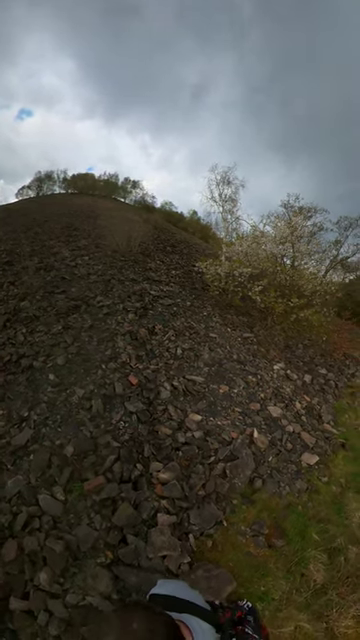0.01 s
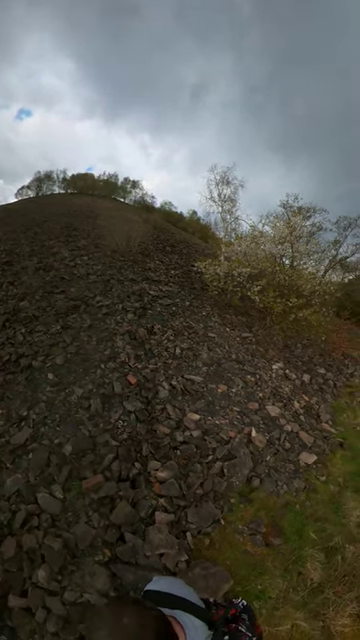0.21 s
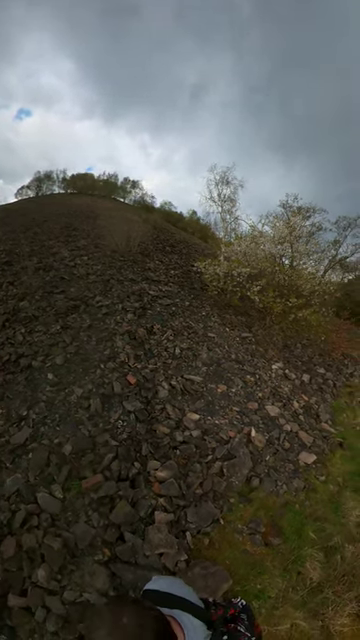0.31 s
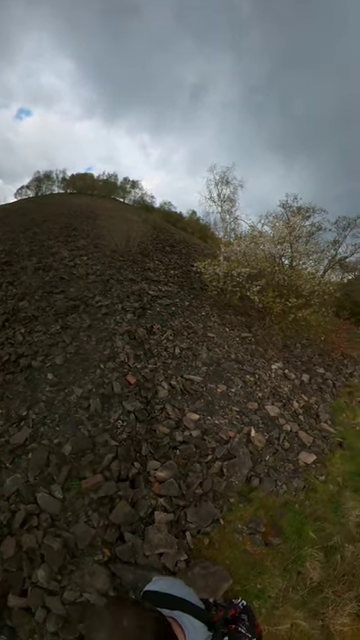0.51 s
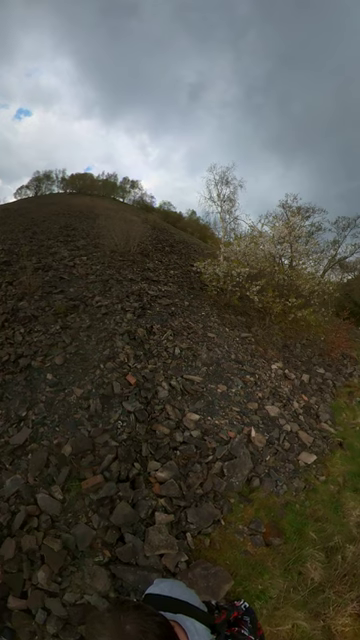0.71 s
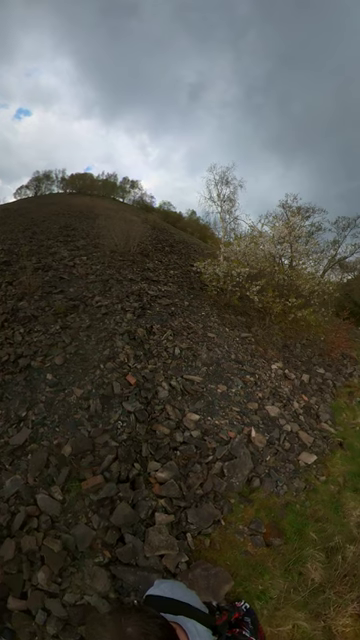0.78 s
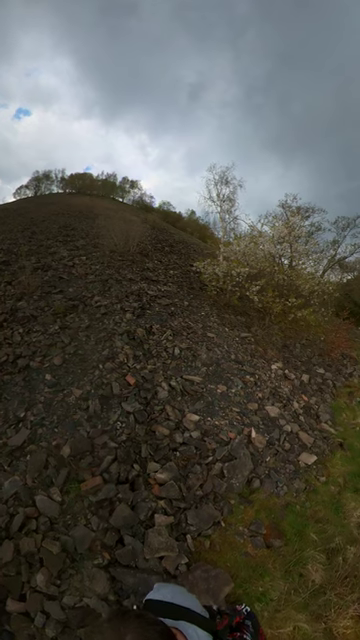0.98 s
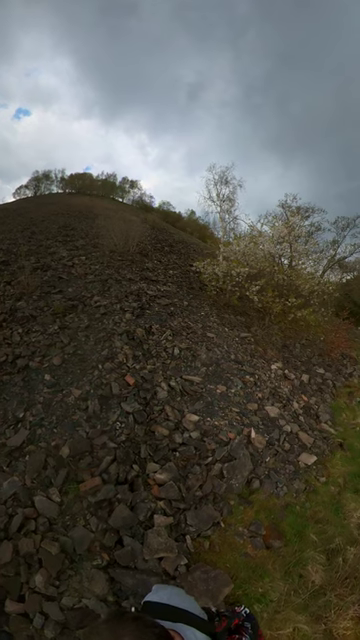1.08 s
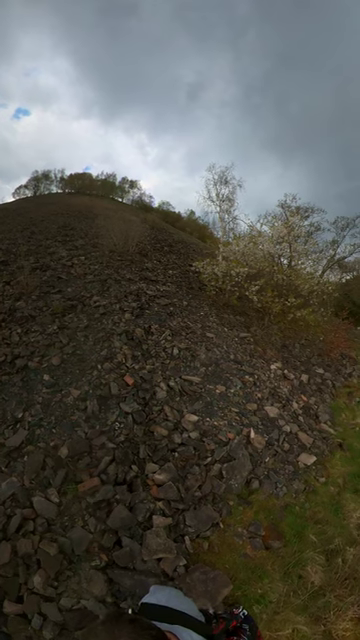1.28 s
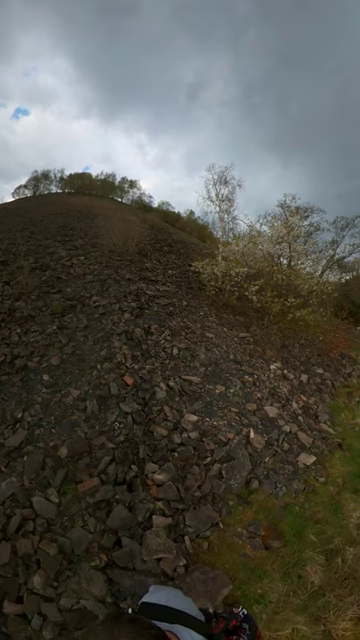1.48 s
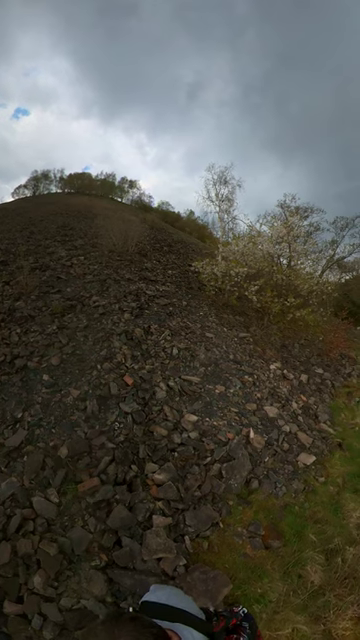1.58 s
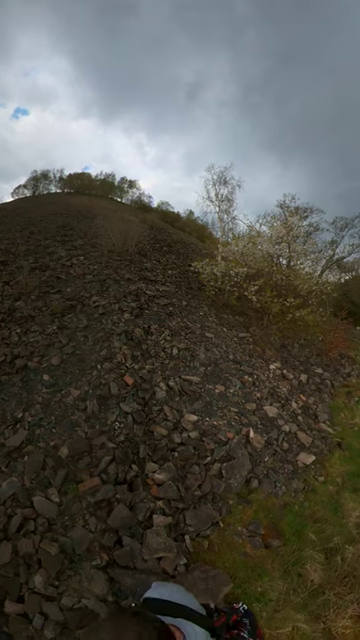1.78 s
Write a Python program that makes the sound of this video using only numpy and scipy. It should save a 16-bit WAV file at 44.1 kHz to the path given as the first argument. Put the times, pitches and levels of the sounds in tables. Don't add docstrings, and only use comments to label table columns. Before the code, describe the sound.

Hammer on stone, close and dry: three sharp knocks, the last softest, each with short grainy rubble echoes and faint steel ring, then small stone clacks; a faint distant bird whistles and wind rumbles outdoors.

```python
import sys
import numpy as np
from scipy import signal
from scipy.fft import rfft, irfft
from scipy.io import wavfile
from scipy.ndimage import uniform_filter1d

SR = 44100
rng = np.random.default_rng(int(sys.argv[2]) if len(sys.argv) > 2 else 0)


def voltage_ratio(decibels):
    exponent = np.asarray(decibels, float) / 20
    return 10 ** exponent


def transcribe(signal):
    frames = np.atleast_2d(signal).T
    limited = np.clip(frames, -1, 1)
    pcm = np.round(limited * 32767).astype(np.int16)
    wavfile.write(sys.argv[1], SR, pcm)


N = 79380


def evened(x):
    return x / np.sqrt(np.mean(x ** 2) + 1e-20)


def read(points, hz):
    f, value = np.transpose(points)
    return np.interp(np.log(hz + 1), np.log(f + 1), value, left=-90)


def curve(points, col=1):
    p = np.array(points)
    return np.interp(np.arange(N) / SR, p[:, 0], p[:, col])


def add(mix, s, sound):
    part = mix[round(s * SR):][:len(sound)]
    part += sound[:len(part)]


def noise(points, n):
    gain = voltage_ratio(read(points, np.fft.rfftfreq(n, 1 / SR)))
    return evened(irfft(rfft(rng.standard_normal(n)) * gain, n))


def low(x, hz, order=2, kind="low"):
    return signal.sosfilt(signal.butter(order, hz, kind, fs=SR, output="sos"), x)


def slow_noise(n, hz):
    return evened(low(rng.standard_normal(n), hz))


def mode(t, hz, db, t60):
    return voltage_ratio(db - 60 * t / t60) * np.sin(2 * np.pi * hz * t)


# t/s, level/dB
GUST_LEVEL = [(0, -57.5), (.15, -62), (.6, -52), (.9, -53), (1.3, -50.5), (1.36, -64), (1.5, -49.5),
              (1.64, -66), (1.8, -65.5)]
# f/Hz, level/dB per Hz
RUMBLE_SPECTRUM = [(8.8, -37.5), (15, 11), (48, -3), (97, 1), (190, -21), (258, -44.5), (330, -55.5),
                   (400, -59.5), (520, -77.5), (880, -120)]
# f/Hz, level/dB per Hz
AIR_SPECTRUM = [(120, -41.5), (200, -6.5), (267, -8), (579, -11), (738, -14), (924, -18.5), (2240, -26),
                (5900, -25), (9410, -42), (12200, -67), (20700, -120)]
# t/s, level/dB
AIR_SWELL_LEVEL = [(0.0, -49), (0.094, -76.5), (1.8, -79)]


def wind():
    lump_db, lumps_hz = 4.5, 7
    lumps = slow_noise(N, lumps_hz)
    rumble = evened(noise(RUMBLE_SPECTRUM + [(800, -96)], N) * voltage_ratio(lump_db * lumps)) * voltage_ratio(curve(GUST_LEVEL))
    swell = curve(AIR_SWELL_LEVEL)
    air_db = -77.5 + 0.16 * (swell - swell[-1])
    return rumble + noise(AIR_SPECTRUM, N) * voltage_ratio(air_db)


# f/Hz, level/dB per Hz
RUBBLE_SPECTRUM = [(150, -1.5), (250, -7), (526, -9), (1210, -11.5), (3200, -19), (4270, -7.5), (5290, -14),
                   (6640, -4.5), (8200, -17.5), (9410, -29.5), (12200, -61), (20700, -120)]
# f/Hz, t60/s
RUBBLE_T60 = [(300, 0.19), (1500, 0.12), (4000, 0.09), (7000, 0.11), (9000, 0.1)]


def scatter(db):
    hz, t, z = signal.stft(noise(RUBBLE_SPECTRUM, 16384), SR, nperseg=128)
    decay_db = -60 * t / np.interp(hz, *np.transpose(RUBBLE_T60))[:, None]
    flicker_db = 2.5 * rng.standard_normal(len(t))
    grain = uniform_filter1d(rng.standard_normal(z.shape), 3, axis=0)
    grain_db = 6.3 * evened(uniform_filter1d(grain, 5, axis=1))
    z = z * voltage_ratio(decay_db + flicker_db + grain_db)
    return voltage_ratio(db) * signal.istft(z, SR, nperseg=128)[1][:16384]


# t/s, level/dB, lowest f/Hz, highest f/Hz, t60/s
SPLINTERS = [(0.0025, -81, 400, 9800, 0.028), (.016, -72, 400, 7200, 0.034), (.272, -60, 510, 12000, 0.029),
             (0.305, -65.5, 500, 4400, 0.045), (0.57, -59, 500, 9000, 0.033), (0.55, -62, 498, 8870, 0.028),
             (0.82, -55, 460, 9000, .06), (0.85, -66.5, 5300, 7700, 0.026), (.988, -61, 1800, 4500, .02),
             (1.06, -66, 3700, 4400, 0.017), (0.2, -40, 386.5, 520, 0.053), (1.4, -55, 420, 730, 0.067),
             (0.089, -71, 7000, 9000, .015), (0.93, -61, 450, 750, 0.07), (1.153, -53, 340, 600, 0.17),
             (1.06, -57.5, 1250, 1900, 0.065), (.827, -58, 830, 2000, .03), (.035, -71, 8400, 9100, .1)]


def splinter(s, db, low_hz, high_hz, t60):
    t = np.arange(3000) / SR
    snap = low(low(noise(RUBBLE_SPECTRUM, len(t)), low_hz, kind="high"), high_hz)
    return s, voltage_ratio(db - 60 * t / t60) * np.minimum(t / .001, 1) * snap


# t/s, peak level/dB, clack level against it/dB, clack f/Hz, t60/s
SLAB_ROCKS = [(.004, -57, 4, 1156, 0.025), (0.0134, -38.5, -16, 1820, 0.016),
              (.306, -42, -12.5, 1153, 0.025), (.564, -51.5, -14, 1130, 0.032),
              (.829, -42.5, 2, 1455, 0.012), (.988, -41, -8, 1257, 0.022), (1.062, -44.5, 0, 1500, 0.026),
              (1.072, -35.5, -21, 1816, 0.023), (1.079, -59, 15, 1500, 0.0094),
              (1.088, -58.5, 3, 1290, 0.021), (1.128, -44.5, -5, 854, 0.029)]
# multiple of its f, level/dB
CLACK_PARTIALS = [(1, 2), (1.27, -13.5)]


def slab_rock(s, db, clack_db, clack_hz, t60):
    slab_hz, grit_hz, grit_db, grit_t60 = 633, 1640, -24.5, 0.16
    t = np.arange(6000) / SR
    clack = sum(mode(t, k * clack_hz, d + clack_db, .8 * t60) for k, d in CLACK_PARTIALS)
    friction = low(low(rng.standard_normal(len(t)), grit_hz, order=8), 350, kind="high")
    grit = voltage_ratio(grit_db - 60 * t / grit_t60) * evened(friction)
    return s, voltage_ratio(db) * np.minimum(t / 0.002, 1) * (mode(t, slab_hz, 0, t60) + clack + grit)


# centre t/s, peak level/dB, f/Hz, half length/s
EDDIES = [(0.109, -51, 78, 0.014), (0.153, -36.5, 57.7, 0.0061), (0.175, -42.5, 68.6, 0.018),
          (0.245, -41, 40.1, 0.015), (0.345, -45.5, 44.3, 0.032), (0.466, -43.5, 46.3, 0.011),
          (0.608, -49.5, 63.8, 0.014), (0.669, -38.5, 52.6, 0.021), (0.746, -33, 50.9, 0.0067),
          (0.811, -35.5, 57.1, 0.016), (0.879, -48.5, 78.2, 0.028), (0.922, -49, 50, 0.024),
          (0.996, -47.5, 41, 0.012), (1.064, -53.5, 40.5, 0.032), (1.139, -34, 46.8, 0.013),
          (1.205, -36.5, 95.5, 0.0073), (1.23, -33.5, 57.4, 0.018), (1.26, -42.5, 53.5, 0.02),
          (1.305, -49, 65.8, 0.021), (1.424, -43, 45.6, 0.019), (1.458, -38.5, 82, 0.0094),
          (1.517, -38, 63.4, 0.0092), (1.553, -46.5, 45.4, .02), (1.605, -59, 81.8, 0.0087)]


def eddy(s, db, hz, half):
    edge_ratio, edge_db = 1.7, -13
    t, turn = np.arange(N) / SR - s, rng.random(2)
    swing = np.cos(2 * np.pi * (hz * t + turn[0])) * np.exp(-(t / half) ** 2)
    edge = np.cos(2 * np.pi * (edge_ratio * hz * t + turn[1])) * np.exp(-(2 * t / half) ** 2)
    return voltage_ratio(db) * (swing + voltage_ratio(edge_db) * edge)


# t/s, f/Hz, level/dB
FIRST_WHISTLE = [(.105, 2950, -86), (.148, 3450, -78), (.157, 3950, -74), (.183, 4000, -76),
                 (.187, 4000, -90)]
# t/s, f/Hz, level/dB
SECOND_WHISTLE = [(.92, 2900, -82), (0.954, 3010, -78), (0.958, 3030, -66), (.98, 3130, -64),
                  (0.984, 3250, -76), (0.993, 3400, -65), (1.003, 3750, -70), (1.009, 4000, -78)]
WHISTLE_ECHO_DB = [-4, 0]


def bird():
    husk_depth, husk_hz = .12, 200
    echo_t60, echo_delay_s, echo_rise_s = .22, .008, 0.015
    out, t = np.zeros(N), np.arange(N) / SR
    u = t[:12000]
    for call, echo_db in zip([FIRST_WHISTLE, SECOND_WHISTLE], WHISTLE_ECHO_DB):
        husk = 1 + husk_depth * slow_noise(N, husk_hz)
        sounding = (t > call[0][0]) * (t < call[-1][0])
        phase = 2 * np.pi * np.cumsum(curve(call)) / SR
        whistle = np.sin(phase) * voltage_ratio(curve(call, col=2)) * sounding * husk
        rise = np.clip((u - echo_delay_s) / echo_rise_s, 0, 1)
        tail = rng.standard_normal(len(u)) * voltage_ratio(-60 * u / echo_t60) * rise
        echo = signal.fftconvolve(whistle, tail / np.linalg.norm(tail))[:N]
        out += whistle + voltage_ratio(echo_db) * echo
    return out


# t/s, level/dB, f/Hz, t60/s
LOOSE_CHIPS = [(.7995, -40, 2010, .06), (.87, -67, 2030, .06), (.879, -55, 2030, .05),
               (.905, -79, 2030, .2), (.866, -69, 5480, .15), (.895, -70, 4340, .2), (.325, -84, 8050, .2),
               (1.235, -80, 4340, .15), (.118, -80, 1350, .12), (.865, -84, 8050, .1),
               (.232, -66, 9220, .09)]


def chip(s, db, hz, t60):
    flutter_depth, flutter_hz, rise_s = .4, 140, .003
    t = np.arange(9000) / SR
    flutter = 1 + flutter_depth * slow_noise(len(t), flutter_hz)
    return s, mode(t, hz, db, t60) * np.minimum(t / rise_s, 1) * flutter


SLAB_MODES = [637, 890, 1175, 1580, 1780, 1975, 2900, 3620, 4005]
HEAD_MODES = [4320, 4780, 5470, 5920, 6200, 6495, 6790, 7070, 7250, 7620, 8110]


def struck_solids(t, excitation, crack_db, damp_s, damp_db):
    swell_turns, crack_t60 = 0.82, 0.014
    rattle_depth, rattle_hz = .2, 300
    body = 0
    for k, (hz, (db, t60)) in enumerate(zip(SLAB_MODES + HEAD_MODES, excitation)):
        swell = 1 - np.exp(-t * hz / swell_turns)
        rattle = 1 + rattle_depth * slow_noise(len(t), rattle_hz)
        body = body + (-1) ** k * mode(t, hz, db, t60) * swell * rattle
    body = body * voltage_ratio(damp_db * np.clip((t - damp_s) / 0.0024, 0, 1))
    crack = low(noise(RUBBLE_SPECTRUM, len(t)), 480, order=4, kind="high")
    return body / abs(body).max() + voltage_ratio(crack_db - 60 * t / crack_t60) * crack


def ground_thump(t, hz, db, lag_s, longer):
    rise_s, t60 = 0.0032, 0.053
    u = np.maximum(t - lag_s, 0)
    return -mode(u, hz, db, longer * t60) * np.minimum(u / rise_s, 1)


def steel_ring(t, rings, ring_db):
    steady, width_hz = .9, 130
    ring = 0
    for hz, db, t60 in rings:
        ring = ring + mode(t, hz, db + ring_db, t60) * (steady + slow_noise(len(t), width_hz))
    return ring


def blow(s, levels, excitation, rings, thump_hz, lag_s, crack_db, damp_s, damp_db, longer):
    contact_s = .0003
    db, thump_db, tail_db, ring_db = levels
    t = np.arange(16384) / SR
    solids = voltage_ratio(db) * struck_solids(t, excitation, crack_db, damp_s, damp_db)
    thump = ground_thump(t, thump_hz, thump_db, lag_s, longer)
    ring = steel_ring(t, rings, ring_db)
    return s, np.minimum(t / contact_s, 1) * (solids + scatter(tail_db) + ring) + thump


BLOW_TIMES = [.2308, .5064, .7864]
# peak/dB, ground thump/dB, scatter tail/dB, steel ring/dB
BLOW_LEVELS = [
    (-11.5, -25, -41.5, -64),
    (-12.5, -27.5, -42.5, -54.5),
    (-15.5, -29, -46.5, -61),
]
# level/dB, t60/s
FIRST_MODES = [(-0.5, 0.034), (-5.5, 0.031), (3.5, 0.021), (-18, .03), (-9, 0.033), (-14.5, .02),
               (-22, 0.075), (-24, 0.028), (-11.5, 0.013), (-2.5, 0.033), (-12.5, 0.011), (-14.5, 0.023),
               (-11, 0.031), (-10, 0.035), (-7, 0.019), (-5, .045), (-21.5, 0.017), (-10.5, 0.022),
               (-11.5, 0.042), (-8, .025)]
SECOND_MODES = [(-4, .03), (-7, 0.036), (1.5, 0.019), (-10.5, 0.028), (-17, 0.016), (-14, .025),
                (-15, 0.017), (-16.5, .02), (-11.5, 0.024), (-19.5, 0.025), (-21.5, 0.022), (-12, .035),
                (-6, .03), (-9, 0.037), (-0.5, 0.036), (-6, 0.031), (-11.5, .03), (-12.5, .03),
                (-14, 0.011), (-19.5, 0.02)]
THIRD_MODES = [(-9, 0.027), (-19.5, 0.027), (-2.5, 0.021), (-4, 0.01), (-16.5, .02), (-13, .029),
               (-14, .03), (-13, .03), (-4.5, .03), (-0.5, .04), (-10, 0.028), (-9.5, .04), (-15, .04),
               (-18.5, .03), (-12, .035), (-13, 0.02), (-22.5, .03), (-23.5, .03), (-22, .03), (-23, 0.033)]
# f/Hz, level/dB, t60/s
STEEL_RINGS = [
    [(4345, -1, .4), (6480, -3, .16), (6800, 2, .48), (8080, -6, .2)],
    [(4330, -7, .22), (6420, 2, .24), (6640, 2, .24), (7257, -6, .16)],
    [(4330, -2, .45), (6470, 2, .27), (6800, -5, .2), (5470, -6, .2)],
]
GROUND_HZ = [139, 131.4, 108]
GROUND_LAG_S = [0.0055, 0.0051, 0.01265]
GROUND_LONGER = [0.98, 1.05, 1.805]
CRACK_LEVELS = [-12, -6.5, -11]
SETTLE_S = [0.0067, .009, 0.018]
SETTLE_DB = [-3, -8, -8]


def strike(mix):
    modes = [FIRST_MODES, SECOND_MODES, THIRD_MODES]
    for args in zip(BLOW_TIMES, BLOW_LEVELS, modes, STEEL_RINGS, GROUND_HZ, GROUND_LAG_S,
                    CRACK_LEVELS, SETTLE_S, SETTLE_DB, GROUND_LONGER):
        add(mix, *blow(*args))


def scene():
    mix = wind() + bird() + sum(eddy(*row) for row in EDDIES)
    earlier_s, earlier_db = 0.0034, -59.5
    add(mix, 0, scatter(earlier_db)[round(earlier_s * SR):])
    strike(mix)
    for row in SLAB_ROCKS:
        add(mix, *slab_rock(*row))
    for row in LOOSE_CHIPS:
        add(mix, *chip(*row))
    for row in SPLINTERS:
        add(mix, *splinter(*row))
    return mix[None]


def low_pass(x):
    return signal.sosfilt(signal.butter(12, 9560, fs=SR, output="sos"), x)


SPLASH_LEVELS = [-76, -62, -64]


def record(dry):
    ghost_s, ghost_db, ghost_hz = .02, -29, 410
    edge_hz, hiss_db = 9300, -99.5
    ahead, t = round(ghost_s * SR), np.arange(N) / SR
    early = low(dry, ghost_hz, kind="high")[:, ahead:]
    x = dry + voltage_ratio(ghost_db) * np.pad(early, ((0, 0), (0, ahead)))
    splash = sum(voltage_ratio(db) * (t > s) * (t < s + .009) for s, db in zip(BLOW_TIMES, SPLASH_LEVELS))
    hiss = rng.standard_normal((2, *x.shape))
    x = low(x, edge_hz, order=16) + voltage_ratio(hiss_db) * hiss[0]
    x = x + low(splash * hiss[1], 12500, order=4)
    return low_pass(x)


dry = scene()
out = record(dry)
transcribe(out)
```